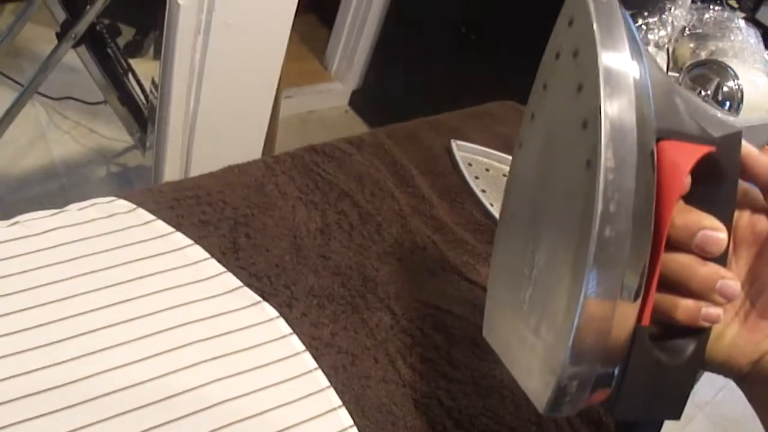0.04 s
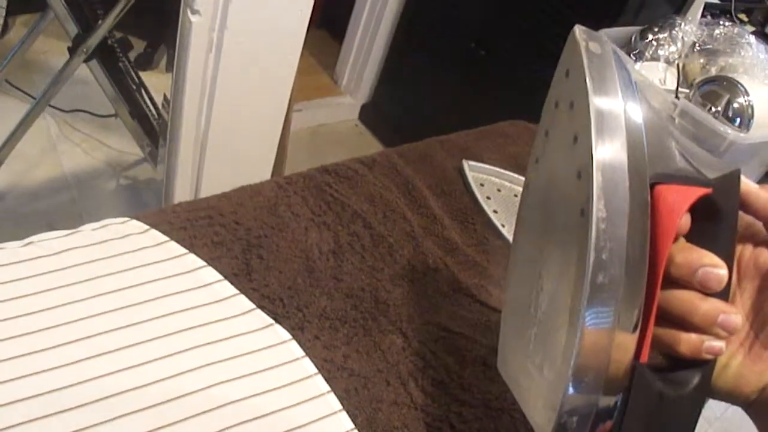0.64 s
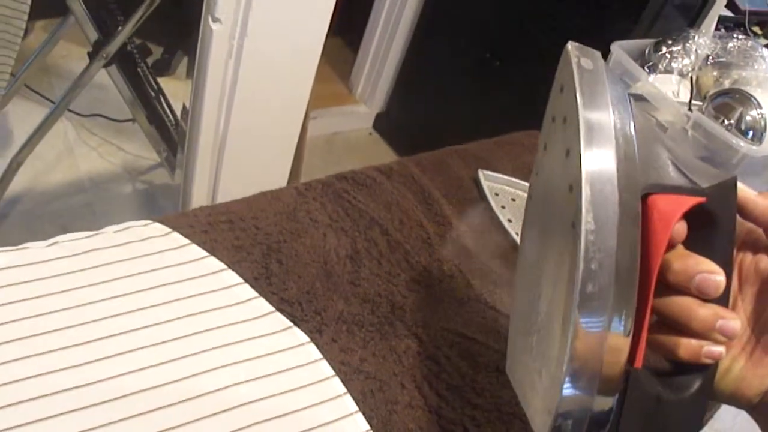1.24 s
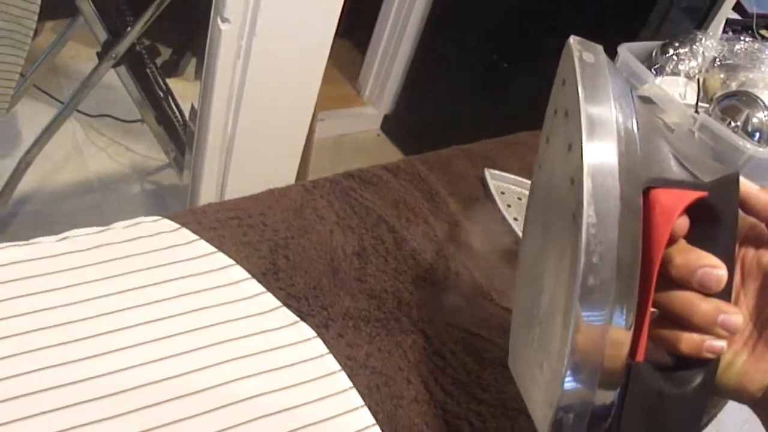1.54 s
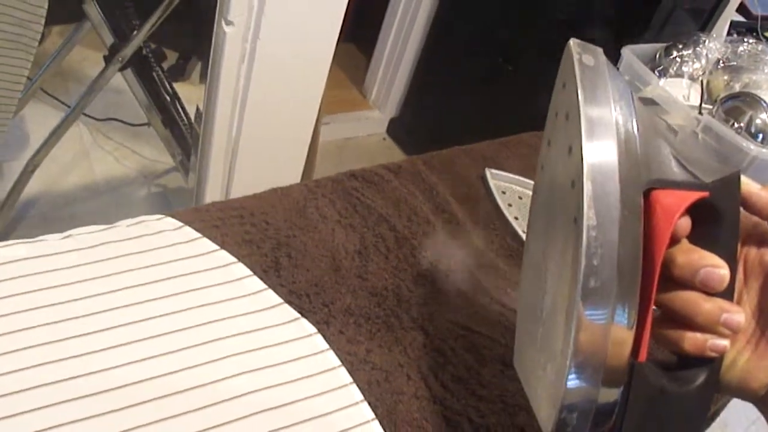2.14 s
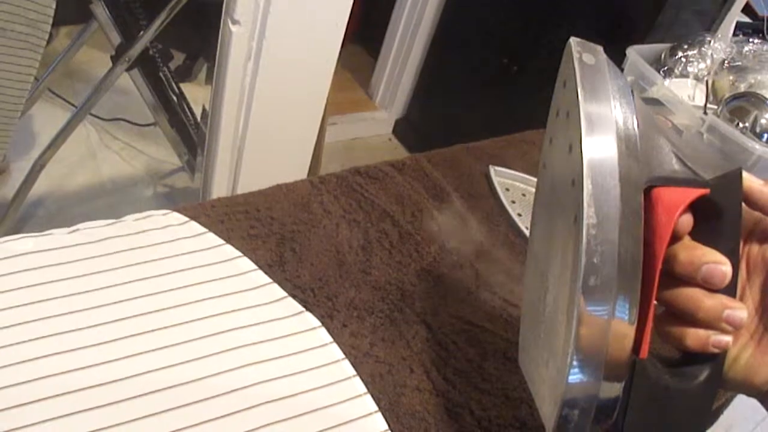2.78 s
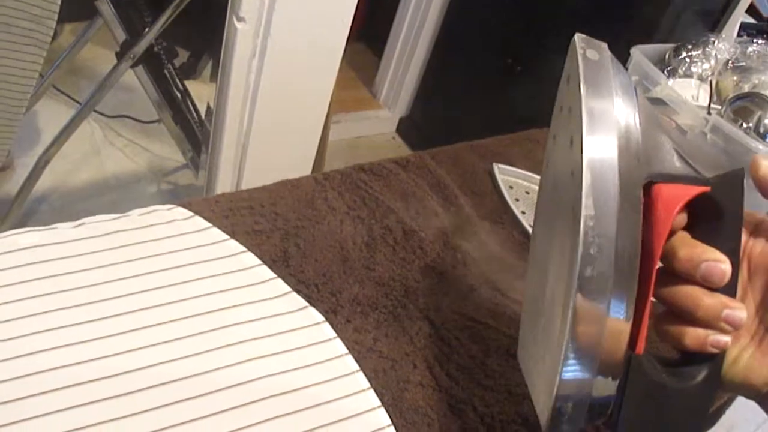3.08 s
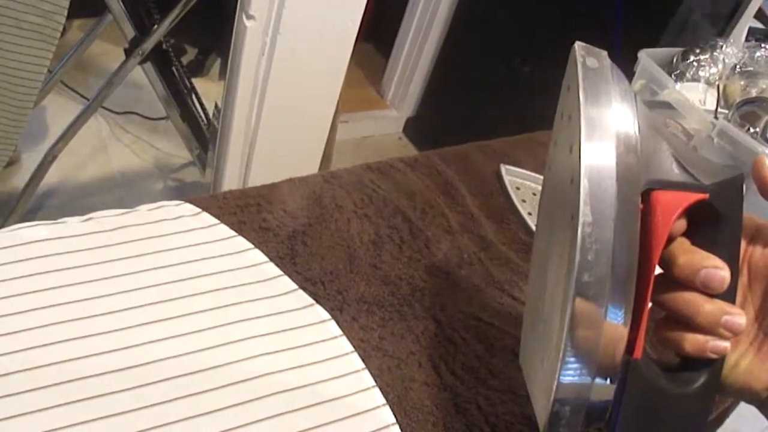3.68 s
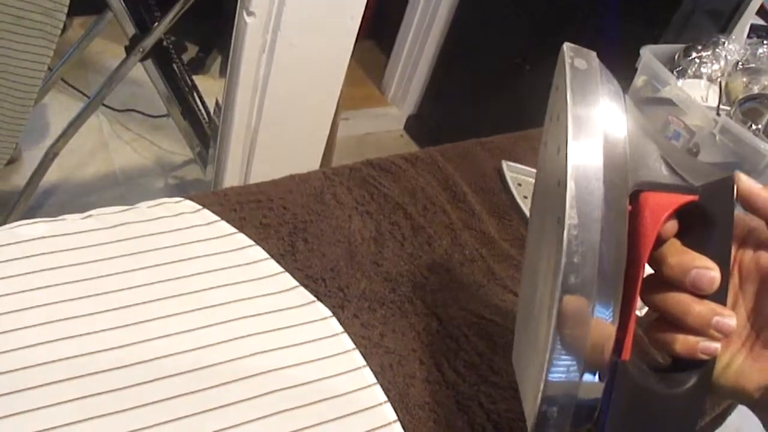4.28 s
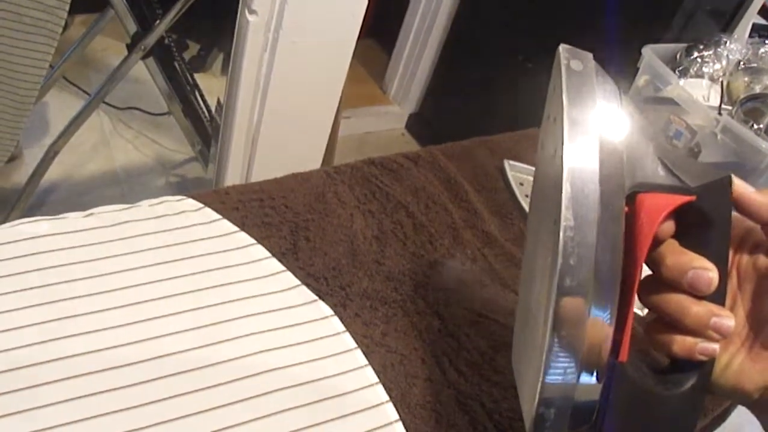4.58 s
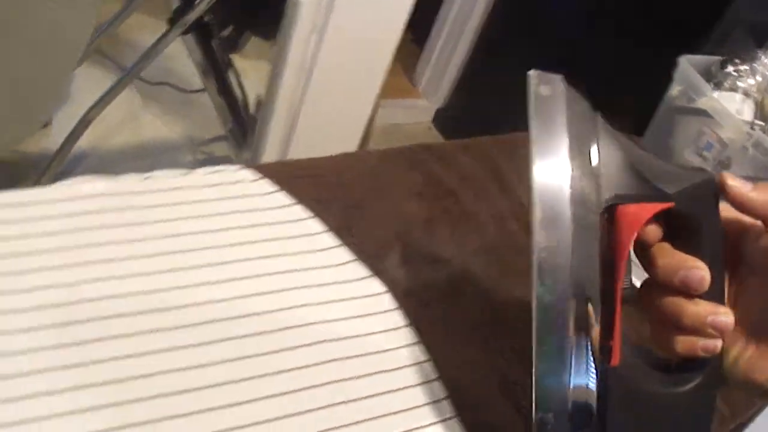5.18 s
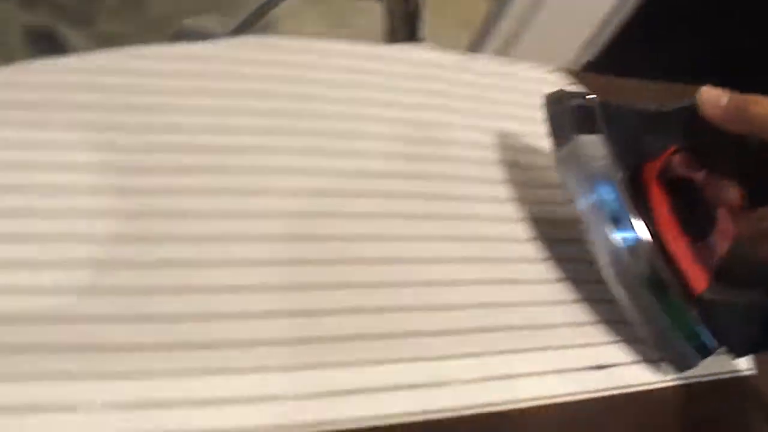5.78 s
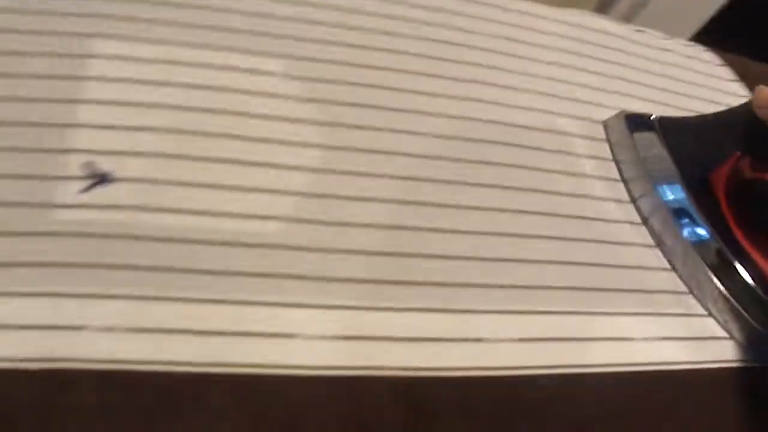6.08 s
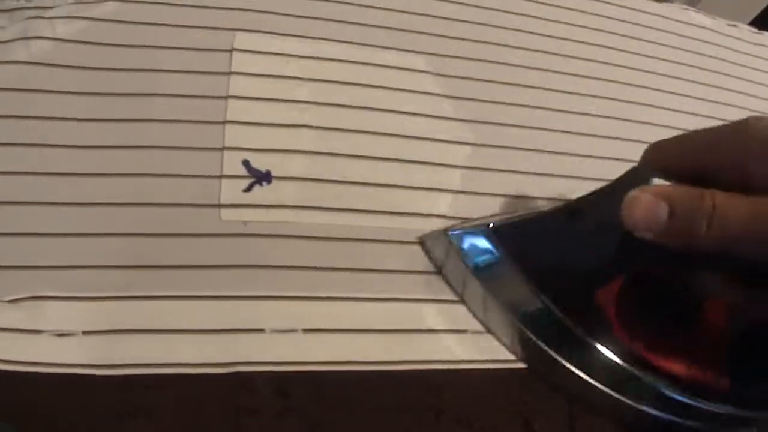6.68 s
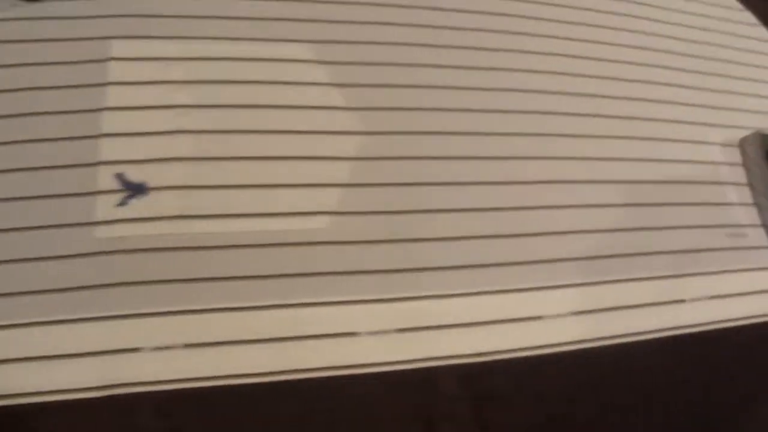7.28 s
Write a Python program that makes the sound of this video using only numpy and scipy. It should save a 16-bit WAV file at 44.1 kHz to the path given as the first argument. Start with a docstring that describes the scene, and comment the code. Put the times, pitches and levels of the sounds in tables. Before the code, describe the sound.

In a small, quiet room, an iron held near the microphone lets out a long, slightly whistling jet of steam after a click and a spit of water. After a brief pause come small plastic clicks and three short, spitting hisses. A faint simmer follows, then soft bumps on a padded board and a muffled, grainy hiss that swells as the iron slides over fabric. A low hum sits far behind.

```python
"""A click and a spit, close to the microphone: an upright steam iron stutters into a long jet, drains,
and fires again in three quick pushes. Water spits as it flashes to steam on the hot plate; the turbulent
steam sounds the chamber and whistles through the holes of the soleplate. The iron simmers, is laid on a
shirt with soft thuds, and hisses on, muffled by the cloth. Behind it lies a small, quiet room with a
faint mains hum that grows as the microphone moves."""
import sys
import numpy as np
from scipy import signal
from scipy.fft import rfft, irfft, next_fast_len
from scipy.io import wavfile
from scipy.ndimage import uniform_filter1d, map_coordinates

SR = 44100
rng = np.random.default_rng(int(sys.argv[2]) if len(sys.argv) > 2 else 0)


def transcribe(u):
    """Save the signal u as a 16-bit wav file named by the first command-line argument.

    u: samples, shape (n,) or (channels, n), limited to [-1, 1]; the rate is SR.
    q: integer samples, one column per channel.
    """
    v = np.clip(np.atleast_2d(u).T, -1, 1)
    q = np.round(v * 32767).astype(np.int16)
    wavfile.write(sys.argv[1], SR, q)


N = 327663
TIME = np.arange(N) / SR


def amp(db):
    """Decibels to gain."""
    return 10 ** (np.asarray(db) / 20)


def to_db(gain):
    """Gain to decibels, with a floor at -120 dB."""
    return 20 * np.log10(np.maximum(gain, 1e-6))


def unit(x):
    """Scale to rms 1."""
    return x / np.sqrt(np.mean(x ** 2) + 1e-20)


def along(points, hz):
    """Read (f/Hz, value) points on a log frequency axis."""
    f, v = np.transpose(points)
    return np.interp(np.log(hz + 1), np.log(f + 1), v)


def ramp(start, length):
    """Go evenly from 0 to 1 over length seconds."""
    return np.clip((TIME - start) / length, 0, 1)


def strike(start, t60, attack):
    """Envelope of a blow; all times in seconds."""
    age = np.maximum(TIME - start, 0)
    return amp(-60 * age / t60) * (1 - np.exp(-age / attack))


def wobble(rate):
    """A smooth random curve, rate knots a second."""
    return map_coordinates(rng.standard_normal(int(N * rate / SR) + 4), [TIME * rate])


def filtered(x, response):
    """Shape the spectrum of x by a response, a function of frequency."""
    size = next_fast_len(len(x) + SR // 4)
    return irfft(rfft(x, size) * response(np.fft.rfftfreq(size, 1 / SR)), size)[:len(x)]


def noise(response, size=N):
    """Coloured noise of rms 1."""
    return unit(filtered(rng.standard_normal(size), response))


def gliding(response, pace):
    """Coloured noise whose frequencies are scaled by pace, sample by sample."""
    return unit(map_coordinates(noise(response, size=N + N // 4), [np.cumsum(pace)], order=3))


def bell(hz, centre, width):
    """A resonance hump that is half as high at the edges of its width."""
    return .5 ** ((2 * (hz - centre) / width) ** 2)


def resonant(modes):
    """Response of a few separate resonances."""
    return lambda hz: sum(amp(db) * bell(hz, centre, width) for centre, width, db in modes)


def register(slope, modes, low_hz, high_hz, order=20):
    """Response of one band of a sloping spectrum lifted by resonances."""
    def response(hz):
        lift_db = sum(db * bell(hz, centre, width) for centre, width, db in modes)
        edges = (1 + (low_hz / (hz + 1)) ** order) * (1 + (hz / high_hz) ** order)
        return amp(along(slope, hz) + lift_db) / edges
    return response


def room():
    """Room tone: still air and a slightly unsteady mains hum that grows as the microphone moves."""
    # spectrum of the air: f/Hz, relative level/dB
    air_colour = [(15, -55), (25, -20), (91, -20), (103, -6.5), (124, -14.5), (205, -17), (239, -8.5),
                  (316, -9.5), (747, -8.5), (1410, -12.5), (8970, -20), (10700, -25), (13900, -47),
                  (22000, -120)]
    # hum partials: f/Hz, level/dB before the gain for distance
    partials = [(118.4, -83.5), (236.9, -75), (355.3, -81.5)]
    far_db, near_db, move_from_s, move_to_s = -4, 7.5, 4.86, 6.09
    distance_db = far_db + (near_db - far_db) * ramp(move_from_s, move_to_s - move_from_s)
    hum = np.zeros(N)
    for hz, db in partials:
        peak = np.sqrt(2) * amp(db + 1.2 * wobble(1.6))
        hum += peak * np.sin(2 * np.pi * hz * TIME + .4 * wobble(9.3))
    air = amp(-62.5) * noise(lambda hz: amp(along(air_colour, hz)))
    return amp(distance_db) * hum + air


def walls(x):
    """The small, furnished room answers briefly and ripples the spectrum of the hiss."""
    # reverberation time: f/Hz, t60/s
    decay = [(150, 0.5), (1000, 0.66), (4000, 0.1), (10000, 0.082)]
    hz, t, spectra = signal.stft(rng.standard_normal(SR // 3), SR, nperseg=256)
    tail = signal.istft(spectra * amp(-60 * t / along(decay, hz)[:, None]), SR, nperseg=256)[1]
    predelay = np.zeros(round(.004 * SR))
    return signal.fftconvolve(x, np.r_[predelay, tail / np.linalg.norm(tail)])[:N]


def bumps():
    """Soft thuds as the soleplate settles on the padded board."""
    # landings: t/s, level/dB
    landings = [(5.735, -54.5), (5.96, -52), (6.095, -51.5), (6.55, -51)]
    # spectrum of the board: f/Hz, relative level/dB
    board = [(40, -20), (110, -13), (220, -2), (400, -8), (1200, -35), (5000, -70)]
    blows = sum(amp(db) * strike(s, t60=0.26, attack=0.0036) for s, db in landings)
    return blows * noise(lambda hz: amp(along(board, hz)))


def simmer():
    """The last water boils off with a thin hiss that grows as the iron tips forward."""
    # spectrum of the idle soleplate: f/Hz, relative level/dB
    colour = [(88, -39), (150, -16.5), (204, -11), (238, -8), (278, -13), (473, -9), (666, -10),
              (1170, -9.5), (1570, -8), (1890, -10), (2130, -11), (3450, -10), (4310, -0.5), (4690, -8),
              (9000, -47), (11700, -63), (19800, -120)]
    from_s, to_s, growth_db_per_s = 4.94, 5.7, 8.5
    level_db = -58 + growth_db_per_s * (np.clip(TIME, from_s, to_s) - from_s)
    gate = ramp(from_s, length=0.045) * (1 - ramp(to_s, length=0.73))
    lift_db = lambda hz: 2.9 * bell(hz, 3800, 450) + 6.5 * bell(hz, 2117, 235.9)
    hiss = noise(lambda hz: amp(along(colour, hz) + lift_db(hz)))
    return gate * amp(level_db + 1.299 * wobble(130)) * hiss


def pressing():
    """Cloth covers the vents: their resonance splits in two; the weave adds a grainy rush and rubs."""
    # the iron on the shirt: t/s, steam flow/dB, cloth rush/dB
    stroke = [(5.7, -55, -58), (5.722, -52, -55), (5.816, -45, -55.5), (6.082, -40, -47),
              (6.438, -40, -46.5), (6.626, -30.5, -41.5), (6.926, -30.5, -40), (7.164, -36, -41.5),
              (7.38, -36.5, -41.5)]
    # spectrum of steam through cloth: f/Hz, relative level/dB
    slope = [(90, -23.5), (180, -11), (400, -1.5), (1000, -0.5), (2000, -2), (2600, 0.5), (4400, -7),
             (5100, -2.5), (6300, -14), (7200, -7.5), (9300, -15.5), (11000, -28)]
    # resonances of the covered soleplate: f/Hz, width/Hz, lift/dB
    modes = [(481, 81, 3.5), (647, 170, 4.5), (1175, 240, 4), (1650, 440, 6.5), (2024, 230, 6.5),
             (3344, 1070, 16.5), (3800, 320, -0.5), (4330, 700, 18.5)]
    # vents that the cloth only half covers: f/Hz, width/Hz, relative level/dB
    half_covered = [(4170, 540, 0), (6930, 520, -13.5)]
    firm_db, flow_share = -40.5, 0.29  # cloth rush under a firm hand; the flow's weight in the fizz
    times, *levels = np.transpose(stroke)
    flow_db, cloth_db = (np.interp(TIME, times, db) for db in levels)
    rub_db = -45.5 + 1.58 * (cloth_db - firm_db)
    fizz_db = -9.5 + flow_share * flow_db + (1 - flow_share) * cloth_db
    covered = lambda low_hz, high_hz: noise(register(slope, modes, low_hz, high_hz))
    vents = amp(flow_db) * covered(2830, 6000)
    weave = amp(cloth_db + 0.31 * wobble(110)) * covered(746, 2670)
    rub = amp(rub_db + 1.2 * wobble(70)) * covered(60, 840)
    fizz = amp(fizz_db) * covered(5020, 12000)
    leak = amp(-39) * strike(5.76, t60=1.6, attack=0.16) * noise(resonant(half_covered))
    grain = amp(0.5 * wobble(180))
    return ramp(times[0], length=0.065) * grain * (vents + weave + rub + fizz + leak)


def trigger():
    """Small, quickly damped clicks of the plastic trigger and its valve."""
    # clicks: t/s, level/dB before the band-pass
    clicks = [(0.0133, -24.5), (3.6516, -56), (4.0327, -33), (4.059, -48), (4.098, -30), (4.3986, -38),
              (5.501, -54)]
    # resonances of the trigger: f/Hz, width/Hz, relative level/dB
    plastic = [(1510, 3600, -17), (3500, 940, 0.5), (4400, 650, -2), (5100, 500, -18), (8470, 3200, -26)]
    blows = sum(amp(db) * strike(s, t60=0.038, attack=0.0007) for s, db in clicks)
    ring = unit(np.tanh(noise(resonant(plastic))))  # dense, without stray peaks
    return signal.sosfilt(signal.butter(2, [1500, 6000], "band", fs=SR, output="sos"), blows * ring)


def spits():
    """Water hits the hot plate: one pressure pop rings the chamber, then a short, low puff follows."""
    # resonances rung by water flashing to steam: f/Hz, width/Hz, relative level/dB
    modes = [(326, 150, -10), (680, 700, 2), (956, 530, 5), (1450, 470, -1.5), (3040, 2000, 4)]
    # spits: t/s, pop gain/dB, puff gain/dB, puff t60/s
    flashes = [(0.023, -5, -25, 0.088), (4.1061, -16.5, -28, 0.13), (4.436, -37, -32, 0.34),
               (4.653, -32, -32, 0.15), (4.787, -45, -42, 0.13)]
    puff = unit(np.tanh(noise(resonant(modes))))
    out = np.zeros(N)
    for start, pop_db, puff_db, t60 in flashes:
        age = np.maximum(TIME - start, 0)
        # neighbouring modes swing in opposite directions
        pop = sum((-1) ** k * amp(db) * np.exp(-np.pi * width * age) * np.sin(2 * np.pi * hz * age)
                  for k, (hz, width, db) in enumerate(modes))
        out += amp(pop_db) * pop + amp(puff_db) * strike(start, t60, attack=0.0056) * puff
    return signal.sosfilt(signal.butter(3, [230, 6500], "band", fs=SR, output="sos"), out)


def push(start, attack_s, let_go, drop_db, drain_s, level_db, surge_db,
         fizz_db, sputter_db, sing_db, vent_hz):
    """Curves of one push: the steam surges, settles as the water boils away, and drains once let go."""
    dry_s, surge_s, choke_s, young_s, shut_s = 0.93, 0.065, 0.022, 0.32, 0.022
    age = np.maximum(TIME - start, 0)
    wet = np.exp(-age / dry_s)  # fresh water adds flow and sputter
    drained = ramp(let_go, drain_s)
    # the valve snaps shut and the pressure falls evenly; the amplitude follows nearly its square
    sag_db = 1.99 * to_db(1 - drained) - drop_db * ramp(let_go, shut_s)
    boost_db = surge_db * np.exp(-age / surge_s) + 3 * wet
    flow_db = level_db + boost_db + sag_db + to_db(1 - np.exp(-age / attack_s))
    flutter_db = 0.06 + 1.16 * np.exp(-age / young_s)
    # the surge briefly chokes the vents: less fizz, more singing
    choke_db = surge_db * np.exp(-age / choke_s)
    # in draining, the fizz fades faster than the flow and the chamber more slowly
    colour_sag_db = np.maximum(sag_db, -40)
    chamber_db = -13 - 0.15 * colour_sag_db
    fizz_db = fizz_db - boost_db + 0.88 * colour_sag_db - 2.1 * choke_db
    # the vent resonance climbs as the steam dries; it arches up and sinks back as it drains
    vent_hz = vent_hz + 22 * age + 222 * np.sin(np.pi * drained)
    return [flow_db, flutter_db, chamber_db, fizz_db,
            sputter_db + 6.5 * wet, sing_db + 2 * choke_db, vent_hz]


def jet():
    """Close up, turbulent steam sounds chamber and vents; fast flow fizzes and carried water sputters."""
    # trigger pushes: start/s, attack/s, let go/s, drop on letting go/dB, drain/s, flow/dB, surge/dB,
    # fizz/dB, sputter/dB, singing/dB (these three re flow), starting vent resonance/Hz
    presses = [(0.025, 0.003, 0.054, -2.5, 0.069, -28, 4.5, -8.5, -36, -15, 3778),
               (0.081, 0.007, 0.152, -4, 0.063, -33, 2, -13.5, -33, 4.5, 3850),
               (0.153, 0.0078, 3.094, 2, 0.495, -27.0, 5.5, -10.5, -37, -14, 3821),
               (4.105, 0.0071, 4.336, 0, 0.35, -27, 0.5, -11, -37, -13.5, 3970),
               (4.432, 0.016, 4.55, -1, 0.32, -27.5, 2, -9.5, -34.5, -23, 3967),
               (4.647, 0.014, 4.81, 0.5, 0.28, -28, 1.5, -10, -37, -17, 3990)]
    # turbulence of the free jet: f/Hz, relative level/dB
    slope = [(90, -39), (180, -36), (300, -22), (600, -20), (1600, -16), (2450, -13), (2800, -6.5),
             (4000, 1), (4900, -2.5), (5800, -15.5), (9500, -14.5), (10300, -20), (11000, -26.5)]
    # resonances of chamber and vents: f/Hz, width/Hz, lift/dB
    modes = [(503, 48, 6), (636, 98, 12), (758.4, 125, 15.5), (1013, 240, 12), (1320, 225, 6),
             (1510, 103, 7.5), (1870, 416, 11), (2245, 185, 7.5), (2887, 800, 10), (3530, 210, 7.5),
             (3785, 350, 10.5), (4180, 390, 6.5), (4686, 470, 6.5), (6600, 170, 4.5), (6850, 550, -3),
             (8330, 360, 4.5), (8950, 400, 5.5)]
    # five sets of separate resonances: f/Hz, width/Hz, relative level/dB
    plate_rings = [(973, 99, -12), (1955, 56, -6), (3670, 210, -5), (7280, 290, -8), (9280, 120, -10.5)]  # sharp rings of the plate
    vent_note = [(4020, 1200, 0)]  # the note of a narrow vent
    slow_vents = [(2820, 620, -12.5), (3510, 560, -5), (3880, 190, -5), (4180, 420, -7), (4750, 1140, -25)]  # slow steam in the vents
    slow_chamber = [(760, 190, -9.5), (960, 75, -1.5), (1320, 350, -4), (2036, 490, 3)]  # slow steam in the chamber
    slow_fizz = [(6200, 2200, -0.5), (7400, 990, 3), (7960, 560, -22), (8930, 1800, 0.5)]  # overtones of the vents
    rest_hz, hollow_from_db, hollow_over_db = 3808, -36.5, 11.5
    pushes = np.array([push(*row) for row in presses])
    strongest = pushes[:, 0].argmax(axis=0)  # at each moment one push rules the jet
    flow_db, flutter_db, *colour = pushes[strongest, :, np.arange(N)].T
    # the chamber takes a moment to fill and drain, so the colour changes gently
    colour = uniform_filter1d(np.array(colour), size=SR // 70, axis=1)
    chamber_db, fizz_db, sputter_db, sing_db, vent_hz = colour
    plate = lambda low_hz, high_hz: register(slope, modes, low_hz, high_hz)
    # steam too slow to fizz sings in narrow, hollow resonances
    slow = np.clip((hollow_from_db - flow_db - fizz_db) / hollow_over_db, 0, 1)
    blend = lambda fast_sound, slow_sound: np.sqrt(1 - slow) * fast_sound + np.sqrt(slow) * slow_sound
    # the vent resonance follows the speed of sound in the steam; the broad hiss glides about half as far
    speed = np.clip(vent_hz / rest_hz, .9, 1.1)
    hiss = blend(gliding(plate(2390, 6700), speed ** 0.55), gliding(resonant(slow_vents), speed))
    waver = amp(0.46 * wobble(15))
    singing = amp(sing_db) * gliding(resonant(vent_note), speed)
    vents = waver * (hiss + singing)
    chamber = blend(noise(plate(482, 2820)), noise(resonant(slow_chamber))) * amp(0.17 * wobble(90))
    fizz = blend(noise(plate(5114, 12600)), noise(resonant(slow_fizz)))
    sputter = noise(plate(105, 522)) * unit(amp(2.5 * wobble(60)))
    whistle = amp(-14.5 - 10 * slow) * noise(resonant(plate_rings))
    steam = vents + amp(chamber_db) * chamber + amp(fizz_db) * fizz + amp(sputter_db) * sputter
    # droplets choke the flow for moments, most while the jet is young
    flutter = amp(flutter_db * wobble(260) + 0.061 * wobble(30.92))
    return amp(flow_db) * flutter * (steam + whistle)


def scene():
    """One microphone close to the iron, with the reflections and room tone well behind."""
    iron = jet() + spits() + trigger() + simmer() + bumps() + pressing()
    reflections = amp(-14) * walls(iron)
    return (iron + reflections + room())[None]


def record(dry):
    """The microphone chain passes nothing above 11 kHz."""
    return filtered(dry[0], lambda hz: hz < 11000)[None]


dry = scene()
out = record(dry)
transcribe(out)
```